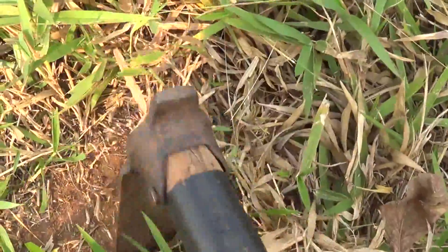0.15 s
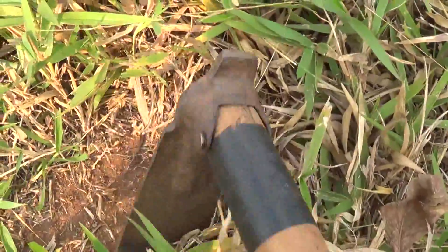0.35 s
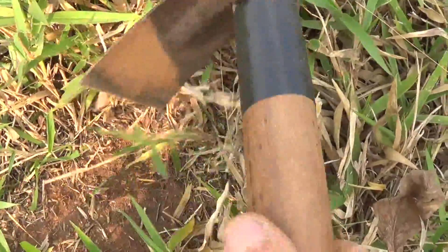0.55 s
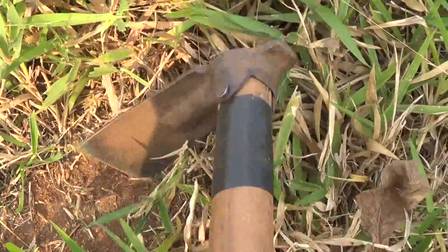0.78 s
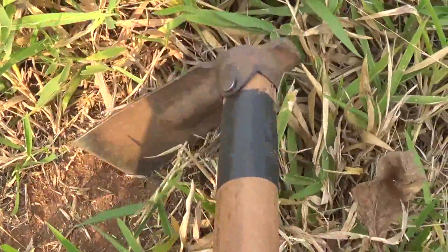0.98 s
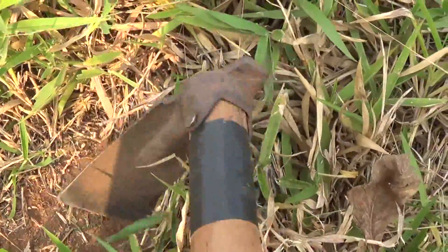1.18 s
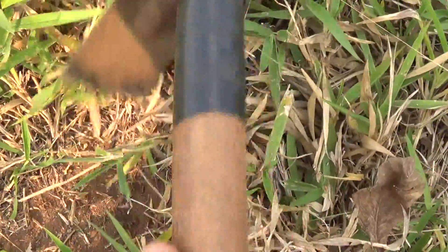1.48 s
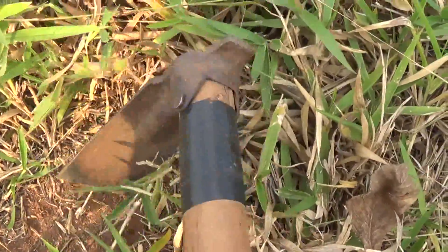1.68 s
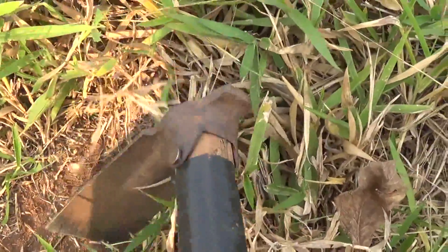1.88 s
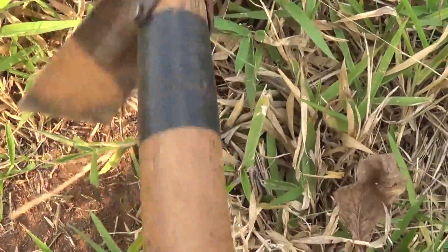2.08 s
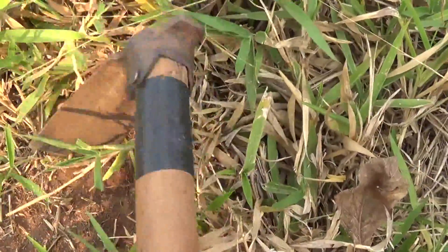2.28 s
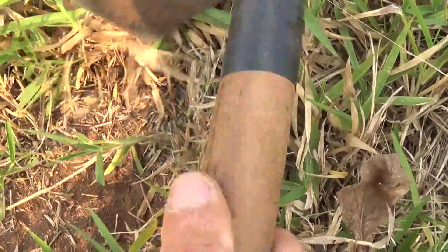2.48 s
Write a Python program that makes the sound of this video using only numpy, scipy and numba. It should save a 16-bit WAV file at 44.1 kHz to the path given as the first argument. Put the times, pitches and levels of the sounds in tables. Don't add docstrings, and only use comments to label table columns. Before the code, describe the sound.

A small steel hoe chops stony, grassy soil, close and dry outdoors. A dense clanking, gritty burst opens at 0-0.2 s; stalks rustle and snap near 0.5 s. Strikes and scrapes follow at 0.7-0.8 and 1.04-1.2, the latter ringing thinly. The longest cluster, 1.57-1.9, has hollow handle knocks and clinks. Snaps lead to chops at 2.3-2.4, then a crisp grass brush around 2.65. Faint hum and air throughout.

```python
import sys
import numpy as np
from scipy import signal
from scipy.fft import rfft, irfft, next_fast_len
from scipy.io import wavfile
from scipy.ndimage import uniform_filter1d
from numba import njit

SR = 44100
rng = np.random.default_rng(int(sys.argv[2]) if len(sys.argv) > 2 else 0)


def transcribe(signal):
    frames = np.atleast_2d(signal).T
    limited = np.clip(frames, -1, 1)
    pcm = np.round(limited * 32767).astype(np.int16)
    wavfile.write(sys.argv[1], SR, pcm)


def level_to_linear(level):
    exponent = np.asarray(level, float) / 20
    return 10 ** exponent


N = 116865
T = np.arange(N) / SR

# (frequency [Hz], level [dB per Hz])
WASH_SPECTRUM = [(20, -26), (50, -20), (100, -5), (200, -4.5), (400, -10), (900, -18.5), (2500, -21.5),
                 (11000, -23.5)]
# (time [s], peak [dB], handle share [dB], clang share [dB], chime share [dB])
BLOWS = [(0.027, -11.5, 5, 9, -10), (0.0525, -26, 5, -8, -7), (0.069, -12.5, 14.5, 5, -10),
         (0.078, -10.5, -5, 0, -13), (0.091, -13, 10, -13, -7), (0.106, -9.5, 2, 0, -4),
         (0.163, -18, -2, 19.5, -26), (0.593, -26.5, 4, 9, -6), (0.7, -28.5, 5, 6, 10),
         (0.726, -16, 15.5, -1, 14.5), (0.762, -10, 13.5, -4, 12), (0.818, -14, -1, 0, -26),
         (1.037, -10.5, -17, -7, 5), (1.06, -10.5, 9.5, 6.5, -19), (1.082, -8, 3, 6.5, 3),
         (1.151, -12, 9, -7, -4), (1.575, -8.5, 15.5, -18, 13.5), (1.608, -8, 13.5, -7, 18.5),
         (1.622, -9, 5, -3, 5), (1.637, -13.5, 6, 13.5, 4), (1.654, -9, 14.5, -2, 2), (1.722, -12, 8, 6, 1),
         (1.815, -13.5, 6, 6, 9), (1.831, -10, 6.5, 3, 5), (2.292, -10.5, 17, -1, -5),
         (2.309, -10.5, 9.5, -1, 6), (2.332, -9, 14, 1, -2), (2.356, -10.5, 11, -4, 1),
         (2.386, -11.5, -1, 4.5, 2)]
# (peak time [s], rise [s], fall [s], level [dB], handle share [dB])
DRAGS = [(0.034, 0.024, 0.015, -25.5, 10), (0.06, 0.018, 0.054, -23.5, 0), (0.144, 0.0091, 0.044, -24, 4.5),
         (0.216, 0.03, 0.05, -37, 14.5), (0.794, 0.039, 0.015, -28.5, 14), (1.013, 0.02, 0.021, -35.5, 12),
         (1.042, 0.0078, 0.031, -39.5, 23), (1.091, 0.021, 0.03, -20.5, 10.5),
         (1.16, 0.027, 0.019, -24.5, 9), (1.209, 0.057, 0.033, -38.5, 15), (1.445, 0.043, 0.074, -39, 1),
         (1.583, 0.006, 0.0072, -20.5, 21), (1.631, 0.021, 0.073, -32.5, 16.5),
         (1.729, 0.013, 0.0034, -21.5, -13), (1.765, 0.03, 0.021, -19.5, 8.5),
         (1.831, 0.022, 0.052, -25, 10), (1.929, 0.044, 0.055, -33, 10), (2.1, 0.0095, 0.069, -49, -15),
         (2.3, 0.0091, 0.014, -33, -7), (2.371, 0.023, 0.038, -31, 15), (2.645, 0.0093, 0.029, -27, 14)]
# (start [s], length [s], extra mode width [Hz])
CHOKES = [
    (0.143, 0.067, 30),
    (0.817, .06, 60),
    (1.176, 0.006, 50),
    (1.607, 0.01, 86.4),
    (1.649, 0.047, 50),
    (1.787, 0.024, 40),
    (1.99, .06, 40),
    (2.45, 0.0065, 35),
]
BLADE_HZ = [2140, 2630, 3570, 3628, 4310, 5977, 6500, 6715, 7040, 7787, 8585, 8885, 9240, 9805]
# (width [Hz], level [dB]), wider dies sooner
BLADE_RING = [(129, -3), (60, -7), (22.5, -5.5), (23.7, -6), (164, -3.5), (12.3, -9), (18, -8.5),
              (45.5, -5.5), (40, -17), (25.1, -10), (30, -9), (60, -2.5), (88, -7.5), (21.5, -10)]
HANDLE_HZ = [10805, 580, 715, 1108, 1295, 1650, 1745]
# (width [Hz], level [dB])
HANDLE_RING = [(114, -11), (24, -16.5), (20.8, -19), (35, -23), (50, -31.5), (50, -22.5), (60, -20)]
# (frequency [Hz], level [dB per Hz])
SOIL_SPECTRUM = [(150, -45), (450, -22), (1000, -5), (2200, 0), (5000, -1), (11000, -4)]
# (peak time [s], rise [s], fall [s], level [dB])
BRUSHES = [(0.03, 0.012, 0.065, -21.5), (.2, 0.066, 0.11, -33), (.38, 0.034, 0.23, -47),
           (0.479, 0.019, 0.017, -29), (0.538, 0.019, 0.024, -31), (0.588, 0.023, 0.02, -34),
           (.67, 0.072, 0.12, -36.5), (0.791, 0.025, 0.024, -29), (.965, 0.036, 0.039, -40),
           (1.07, 0.019, 0.19, -33), (1.33, 0.044, 0.16, -40), (1.444, 0.015, 0.015, -21),
           (1.565, 0.035, 0.01, -22), (1.629, 0.059, 0.033, -20.5), (1.692, 0.0041, 0.077, -44),
           (1.778, 0.076, 0.25, -28), (2.089, 0.02, 0.013, -38.5), (2.2, 0.05, 0.017, -38.5),
           (2.27, 0.041, 0.019, -28.5), (2.36, 0.058, 0.26, -38), (2.539, 0.048, 0.032, -25.5),
           (2.645, 0.029, 0.022, -12.5)]
# (frequency [Hz], level [dB per Hz])
GRASS_SPECTRUM = [(150, -42), (500, -11), (2200, 0.5), (11000, 2.5)]
# (time [s], peak [dB])
SNAPS = [(0.472, -18), (0.528, -21), (0.574, -19), (0.584, -7), (0.841, -15), (0.9, -26), (0.928, -23),
         (0.961, -14), (1.008, -15.5), (1.438, -23), (1.452, -20), (1.558, -12), (1.691, -11.5),
         (2.191, -16.5), (2.219, -14.5), (2.248, -10.5), (2.286, -11.5), (2.568, -10), (2.598, -18)]
# (peak time
# [s], frequency [Hz], fall [s], level [dB])
CLINKS = [(.029, 1021, 0.0039, -18), (0.036, 2100, .004, -23), (.04, 208, 0.019, -35),
          (0.054, 3550, 0.0064, -11), (.055, 451.7, 0.0025, -20), (.063, 4470, 0.0034, -21),
          (.071, 4350, 0.0046, -19), (.081, 1750, 0.0061, -24.5), (0.096, 2720, 0.0051, -18.5),
          (0.125, 3600, 0.018, -23), (.162, 1310, 0.021, -29), (0.199, 2650, .004, -23),
          (0.7273, 2464, 0.0015, -15), (0.7277, 5070, 0.00099, -16), (.764, 1753, 0.0025, -15.5),
          (.78, 2220, 0.0025, -18), (0.797, 2500, 0.0027, -18), (1.112, 5980, 0.044, -21.5),
          (1.116, 3653, 0.016, -20), (1.151, 3610, 0.011, -27), (1.171, 3580, 0.0075, -23.5),
          (1.148, 2330, 0.003, -24), (1.164, 2200, 0.0041, -28), (1.196, 2110, 0.0056, -33),
          (1.624, 2100, 0.0092, -21), (1.66, 1735, 0.0085, -18.5), (1.726, 1700, .005, -19.5),
          (1.765, 1746, 0.0065, -22), (1.793, 1643, 0.0083, -24.5), (1.794, 3600, 0.015, -25.5),
          (1.838, 1680, 0.013, -17), (1.861, 3606, 0.012, -19.5), (1.882, 3640, 0.017, -20.5),
          (1.88, 1682, 0.0094, -24), (1.904, 1663, 0.011, -32), (1.93, 3597, 0.022, -24),
          (2.312, 2920, 0.0035, -24.5), (2.311, 2104, 0.0065, -22.5), (2.357, 4730, 0.0019, -15),
          (2.366, 4400, 0.0035, -23), (2.374, 3610, 0.02, -23.5), (2.39, 2370, 0.0088, -22),
          (2.42, 711, 0.074, -41.5), (.093, 4350, 0.0042, -16), (.121, 4200, 0.0044, -20),
          (1.773, 700, 0.012, -25.5), (2.388, 9180, 0.0074, -19.5), (.113, 7780, 0.0093, -17.5),
          (0.093, 6700, .004, -14), (1.68, 370, 0.014, -34.5)]
# (peak time [s], frequency [Hz], rise [s], fall [s], level [dB])
THUDS = [
    (0.183, 176, 0.017, 0.014, -37.5),
    (0.728, 390, 0.00079, 0.0097, -25.5),
    (1.509, 436, 0.011, 0.0073, -34.5),
    (1.58, 391, 0.00061, 0.012, -20),
    (1.663, 232, 0.013, 0.016, -36),
    (2.296, 405, 0.0022, 0.0096, -26),
    (2.333, 367, 0.002, 0.0073, -31.5),
]

CLANG_HZ, CHIME_HZ = 3600, 5977


def evened(x):
    return x / np.sqrt(np.mean(x ** 2) + 1e-20)


def coloured(x, points, tilt_db=0):
    hz, db = np.transpose(points)
    size = next_fast_len(len(x) + 2048)
    octaves = np.log2(np.fft.rfftfreq(size, 1 / SR) + 1)
    shape_db = np.interp(octaves, np.log2(hz), db) + tilt_db * (octaves - 12)
    return irfft(rfft(x, size) * level_to_linear(shape_db), size)[:len(x)]


def swell(peak, rise, fall, db):
    width = np.where(T < peak, max(rise, 0.0005), max(fall, 0.002))
    return level_to_linear(db) * np.exp(-((T - peak) / width) ** 2)


def drift(per_s):
    at = np.arange(0, T[-1] + 1, 1 / 400)
    steps = uniform_filter1d(rng.standard_normal(len(at)), max(int(400 / per_s), 1))
    return np.interp(T, at, evened(steps))


def grains(per_s, spread_db):
    hit = rng.random(N) < per_s / SR
    size = level_to_linear(spread_db * np.minimum(rng.exponential(1, N), 4))
    noise = rng.standard_normal(N)
    return evened(hit * size * np.sign(noise) + 0.046 * noise)


def burst(noise, s, fade_s):
    at = round(s * SR)
    part = noise * np.exp(-np.arange(len(noise)) / (SR * max(fade_s, 2e-4)))
    return slice(at, at + len(noise)), part / np.abs(part).max()


@njit
def ring(drive, pole):
    out, z = np.zeros(len(drive)), 0j
    for i in range(len(drive)):
        z = z * pole[i] + drive[i]
        out[i] = z.imag
    return out


def wash():
    mid = evened(coloured(rng.standard_normal(N), WASH_SPECTRUM))
    side = evened(coloured(rng.standard_normal(N), WASH_SPECTRUM)) * level_to_linear(-11)
    return level_to_linear(-48.5 + 2.6 * drift(per_s=7)) * np.array([mid + side, mid - side])


def dragged_grit():
    grit = grains(per_s=2600, spread_db=3) * level_to_linear(1.5 * drift(per_s=70))
    steel = grit * sum(swell(*drag[:4]) for drag in DRAGS)
    wood = grit * sum(swell(peak, rise, fall, db + handle_db) for peak, rise, fall, db, handle_db in DRAGS)
    return steel, wood


def blows(mode_hz, is_handle):
    touch_s, crack_s, smear_s = 0.001, 0.0047, 0.0025
    tick_db, ring_db, scatter_db = -3, 3, 2.2
    count = len(mode_hz)
    is_clang, is_chime = np.abs(mode_hz - CLANG_HZ) < 50, mode_hz == CHIME_HZ
    crack, kicks = np.zeros(N), np.zeros((count, N))
    for s, db, handle_db, clang_db, chime_db in BLOWS:
        onset = np.minimum(T[:1024] / touch_s + 0.12, 1)
        at, crunch = burst(rng.standard_normal(1024) * onset, s, crack_s)
        crack[at] += level_to_linear(db) * crunch
        crack[at.start] -= level_to_linear(db + tick_db)
        luck = rng.standard_normal(count)
        share_db = scatter_db * luck + handle_db * is_handle
        share_db = np.where(is_clang, clang_db, np.where(is_chime, chime_db, share_db))
        late = rng.permutation(count) / count * smear_s
        start = np.round((s + late) * SR).astype(int)
        kicks[np.arange(count), start] += level_to_linear(db + ring_db + share_db) * np.sign(luck) * 4
    return crack, kicks


def choked_ring(hz, width, db, drive, choke):
    pulled_hz = hz + 0.74 * width * drift(per_s=12)
    damping = np.abs(width + choke * min(hz / CLANG_HZ, 1))
    pole = np.exp(np.pi / SR * (2j * pulled_hz - damping))
    return level_to_linear(db) * np.sqrt(width / 300) * ring(drive, pole)


def hoe():
    mode_hz = np.array(BLADE_HZ + HANDLE_HZ)
    is_handle = np.arange(len(mode_hz)) > len(BLADE_RING)
    steel, wood = dragged_grit()
    crack, drive = blows(mode_hz, is_handle)
    for i, on_handle in enumerate(is_handle):
        drive[i] += (wood if on_handle else steel) * level_to_linear(2.5 * drift(per_s=60))
    choke = sum(width * ((T > s) & (T < s + length)) for s, length, width in CHOKES)
    rung = sum(choked_ring(hz, width, db, push, choke)
               for hz, (width, db), push in zip(mode_hz, BLADE_RING + HANDLE_RING, drive))
    rung = signal.sosfilt(signal.butter(4, 480, "high", fs=SR, output="sos"), rung)
    return 0.18 * rung + coloured(crack + level_to_linear(-15) * steel, SOIL_SPECTRUM)


def grass():
    snap_s, fizz_db = 0.0011, -11
    crackle = grains(per_s=4000, spread_db=3.1) * level_to_linear(1.6 * drift(per_s=90))
    out = evened(coloured(crackle, GRASS_SPECTRUM)) * sum(swell(*brush) for brush in BRUSHES)
    low_cut = signal.butter(1, 1500, "high", fs=SR)
    for s, db in SNAPS:
        noise = rng.standard_normal(1024)
        at, tick = burst(noise, s, snap_s)
        fizz = burst(noise[::-1], s, 6 * snap_s)[1]
        snap = signal.lfilter(*low_cut, tick + level_to_linear(fizz_db) * fizz)
        out[at] += level_to_linear(db) * snap / np.abs(snap).max()
    return out


def stone_clinks():
    shake = drift(per_s=200)
    clock = T + 0.003 * np.cumsum(shake) / SR
    flutter = level_to_linear(3 * shake[::-1])
    out = np.zeros(N)
    for s, hz, fall, db in CLINKS:
        out += swell(s, 0.45 * fall, fall, db) * flutter * np.sin(2 * np.pi * hz * clock)
    return out


def thuds():
    return sum(swell(s, rise, fall, db) * np.sin(2 * np.pi * hz * (T - s))
               for s, hz, rise, fall, db in THUDS)


def ground_echo(near):
    fade = np.exp(-np.arange(1024) / (SR * 0.0033))
    turn = 2 * np.pi * 1.0 * T
    echo = np.zeros(N)
    for weight in (np.sin(turn), np.cos(turn)):
        taps = rng.standard_normal(1024) * fade
        echo += signal.oaconvolve(near * weight, taps / np.linalg.norm(taps))[:N]
    return level_to_linear(-14.5) * coloured(echo, [(100, 0), (20000, 0)], tilt_db=-1.5)


def scene():
    near = hoe() + grass() + stone_clinks() + thuds()
    side = ground_echo(near)
    balance = level_to_linear(np.array([[0.5], [-0.5]]))
    return np.array([near + side, near - side]) * balance + wash()


def band_limit(x):
    return signal.sosfilt(signal.butter(12, 12360, fs=SR, output="sos"), x)


def record(dry):
    ceiling, edge_hz = 0.69, 11076
    limited = ceiling * np.tanh(dry / ceiling)
    size = next_fast_len(N + 2048)
    over_khz = (np.fft.rfftfreq(size, 1 / SR) - edge_hz) / 1000
    edge_db = -23.5 * np.clip(over_khz / 0.3 + 0.5, 0, 1)
    edge_db = edge_db - 34 * np.maximum(over_khz, 0)
    mix = irfft(rfft(limited, size) * level_to_linear(edge_db), size)[:, :N]
    return band_limit(mix)


dry = scene()
out = record(dry)
transcribe(out)
```